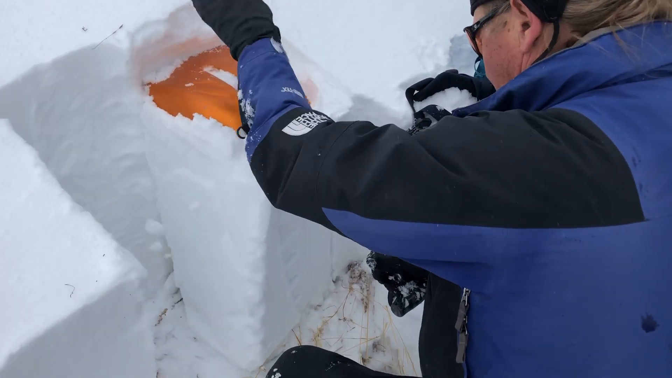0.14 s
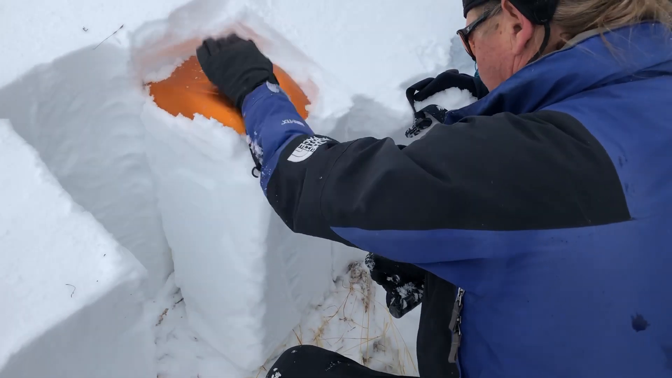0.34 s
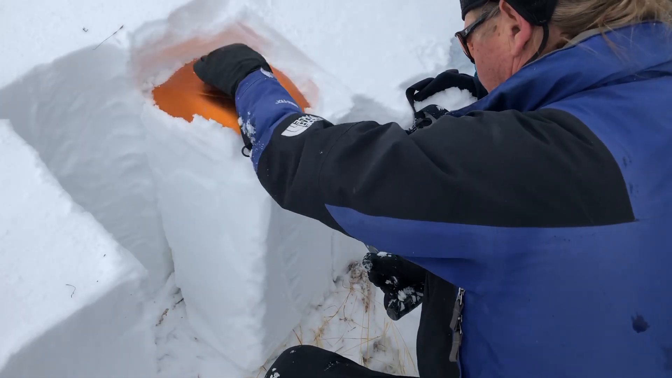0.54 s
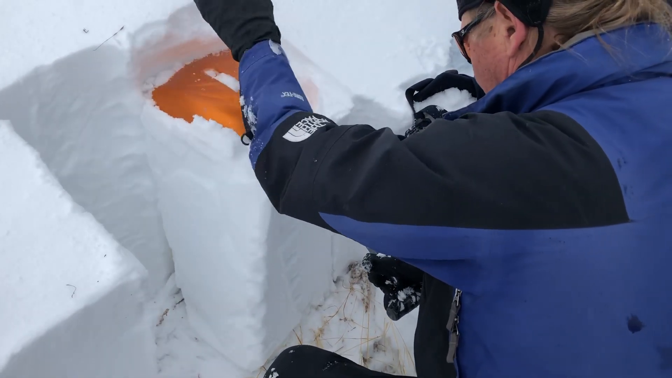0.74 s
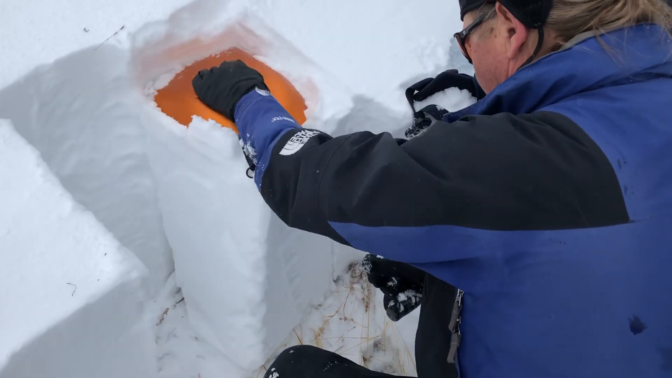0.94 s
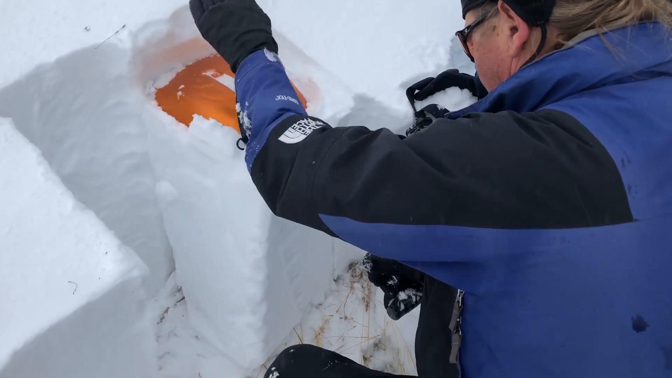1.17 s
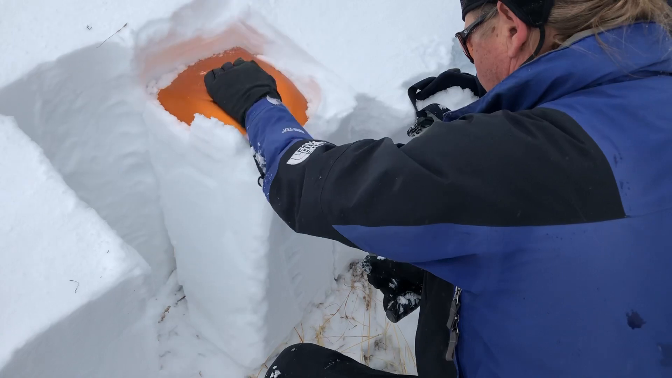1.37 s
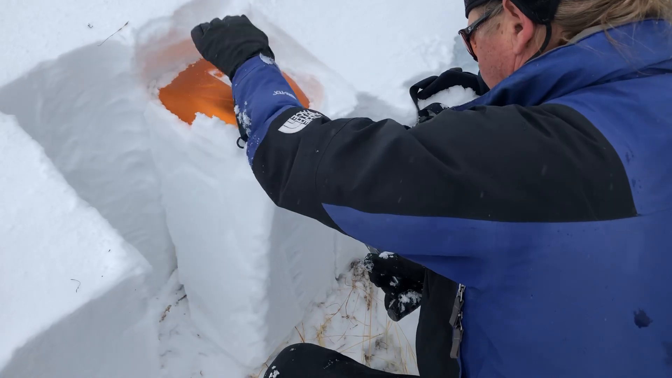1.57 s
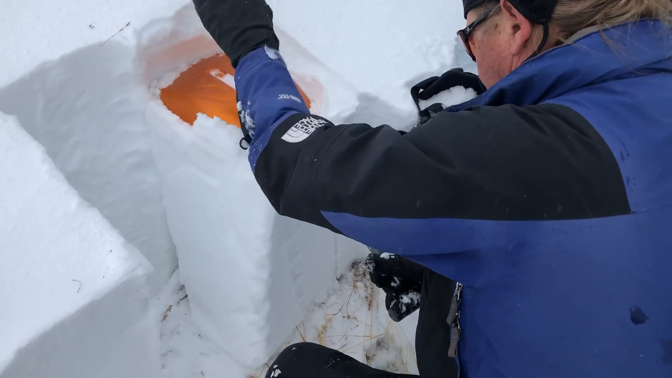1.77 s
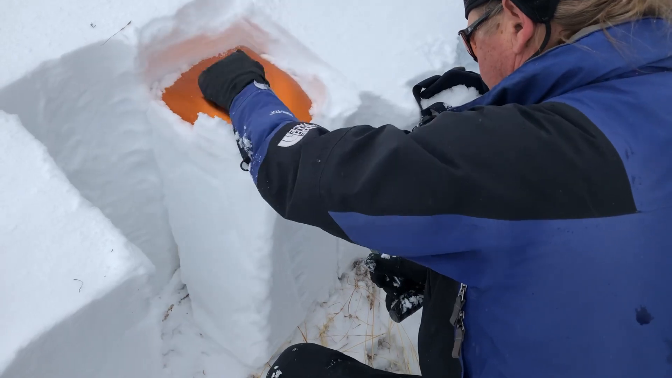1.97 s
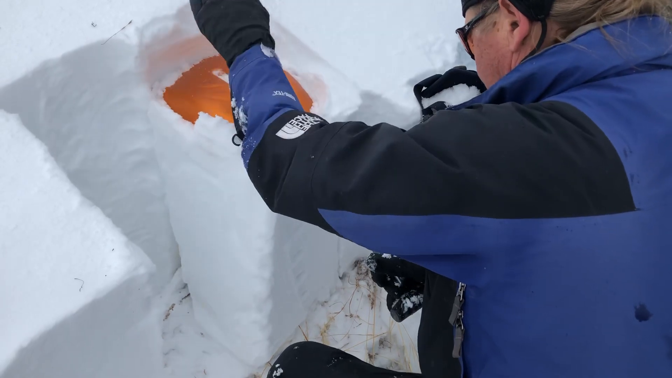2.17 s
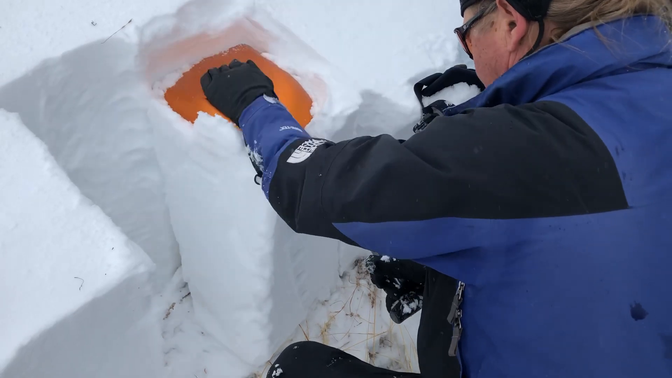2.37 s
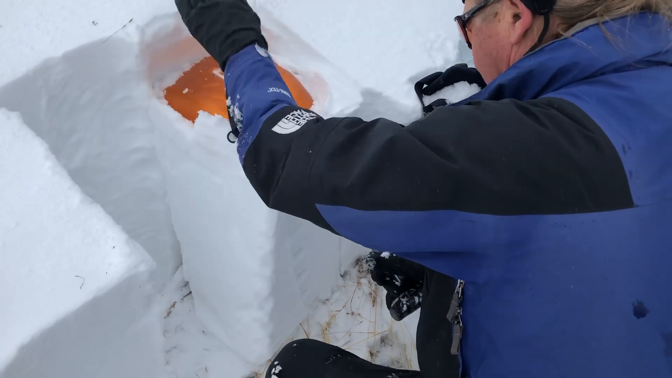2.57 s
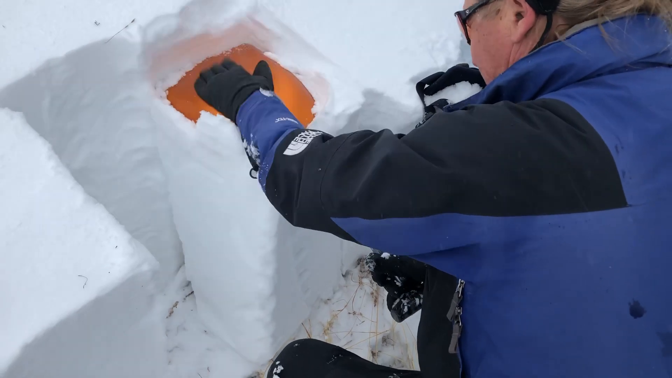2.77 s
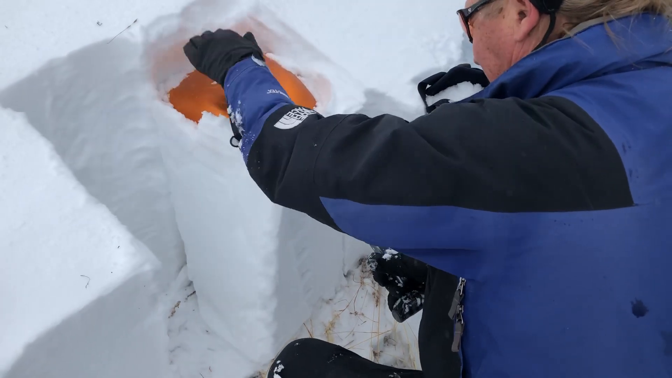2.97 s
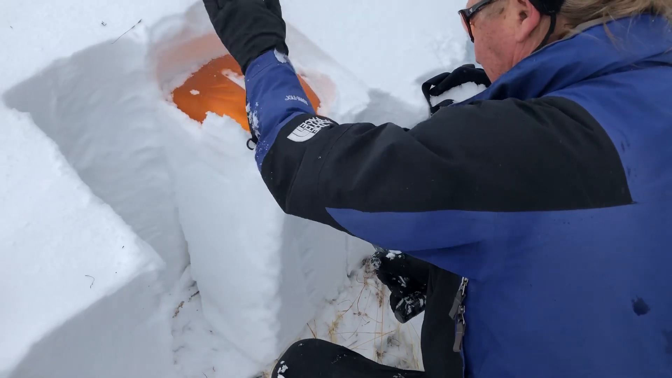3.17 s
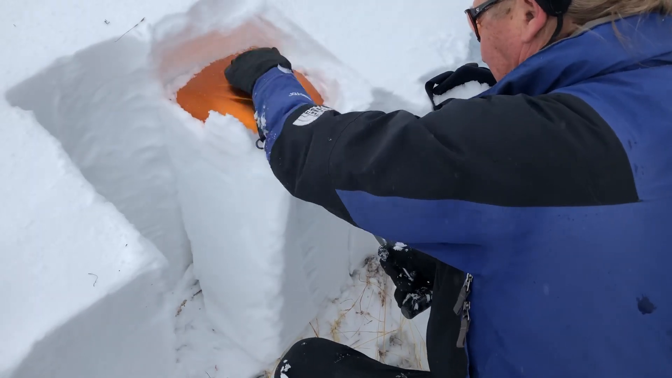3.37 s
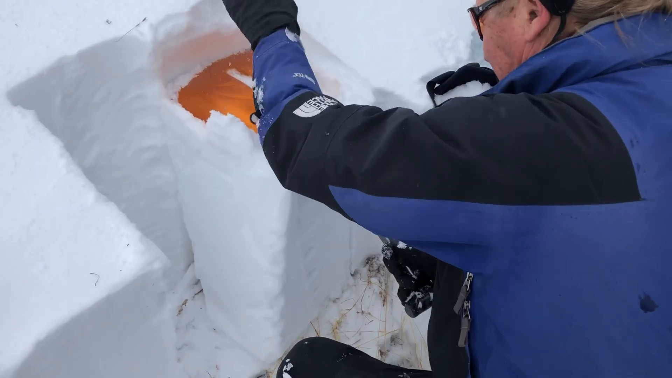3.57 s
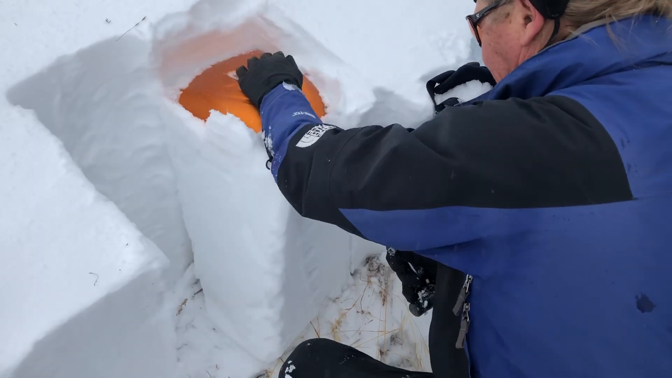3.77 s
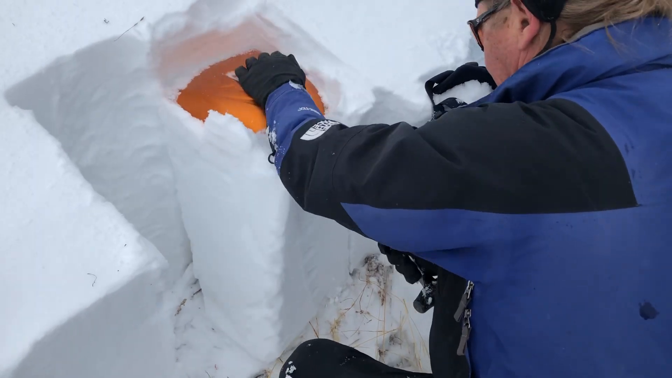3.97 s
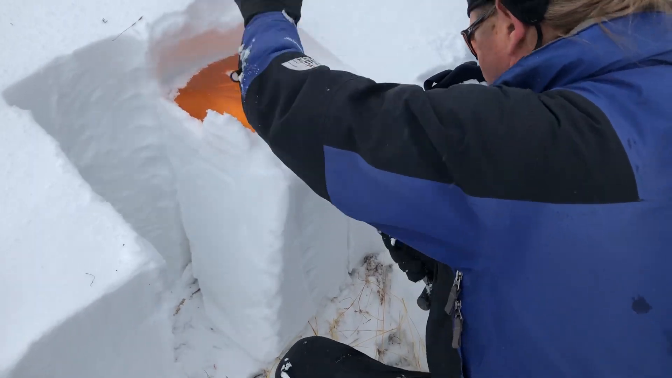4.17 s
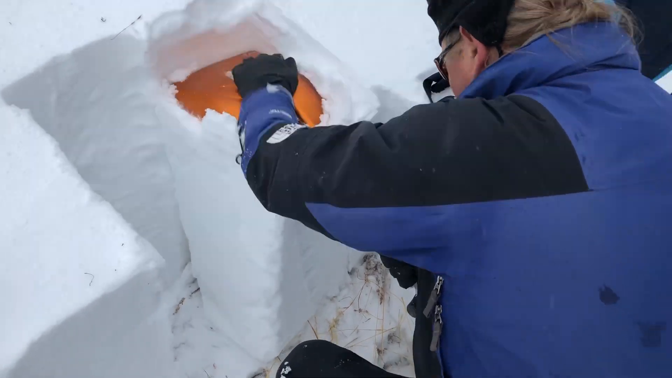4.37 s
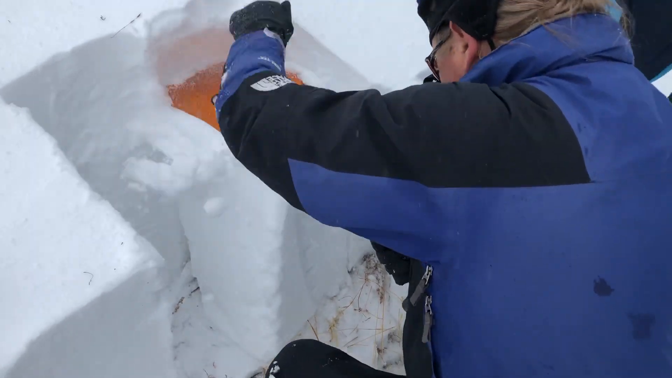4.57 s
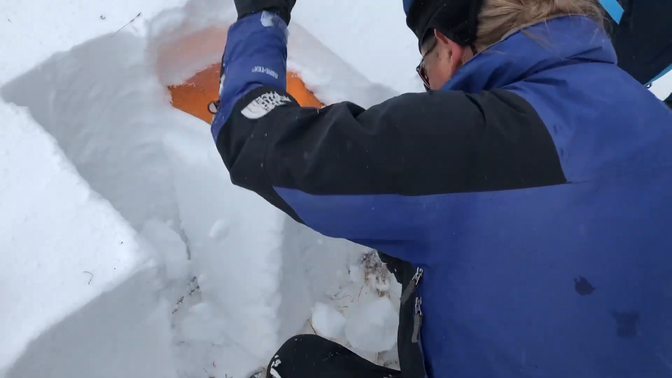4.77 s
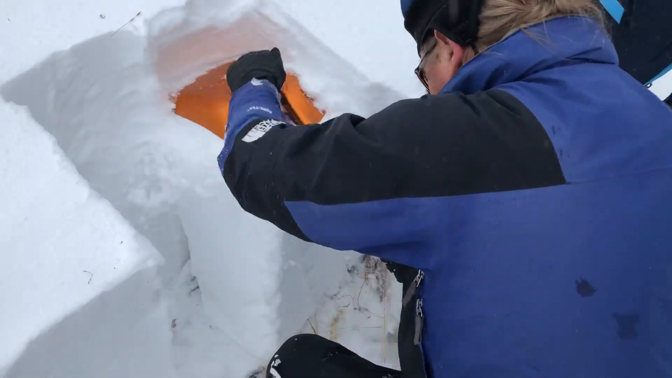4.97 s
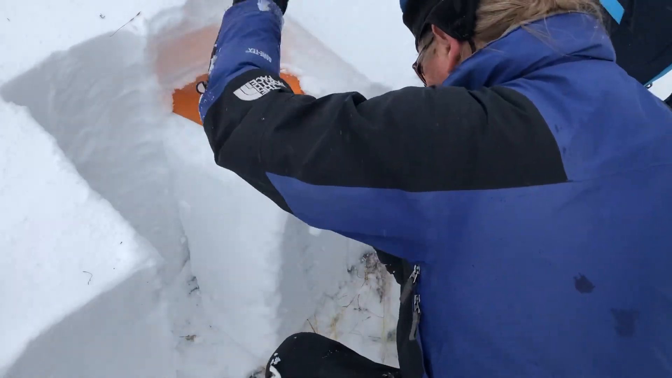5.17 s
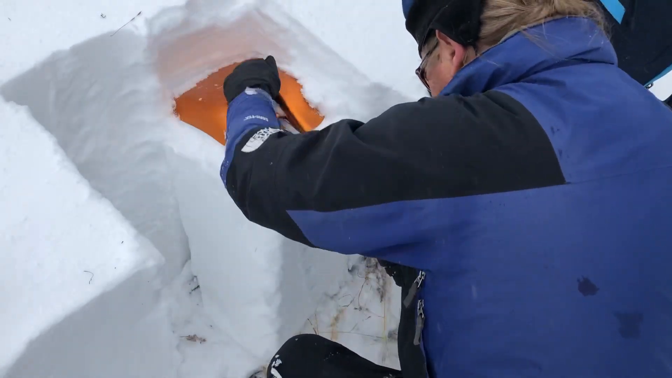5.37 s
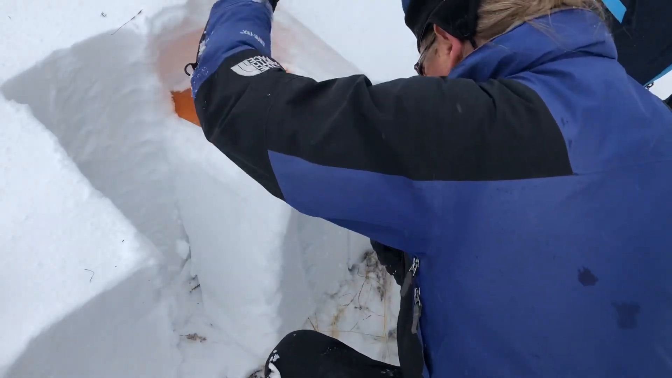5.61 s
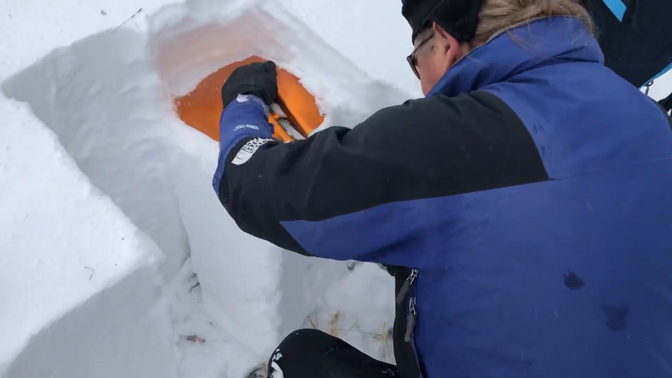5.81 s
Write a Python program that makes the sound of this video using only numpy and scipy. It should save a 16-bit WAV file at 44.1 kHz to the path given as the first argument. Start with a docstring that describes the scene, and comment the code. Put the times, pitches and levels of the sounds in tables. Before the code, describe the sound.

A gloved hand taps a metal shovel blade on snow twelve times, dull even knocks, the last four harder, with jacket rustle.

```python
"""A gloved hand taps a metal shovel blade lying flat on a snow column: twelve taps, the last four harder.
Snow damps the blade, so each tap is a brush of fabric, a short clack, a low thump and a little crunch.
The glove rebounds after the first five taps. The sleeve rustles, creases and snow crumbs tick,
and the arm pushes puffs of air. Quiet outdoor air lies underneath; the open slope gives no echo."""
import sys
import numpy as np
from scipy import signal
from scipy.fft import rfft, irfft, next_fast_len
from scipy.io import wavfile
from scipy.ndimage import uniform_filter1d

SR = 44100
rng = np.random.default_rng(int(sys.argv[2]) if len(sys.argv) > 2 else 0)


def bounce(signal):
    """Save signal as a 16-bit WAV file at the path given by the first command-line argument."""
    frames = np.transpose(np.atleast_2d(signal))
    limited = np.clip(frames, -1, 1)
    pcm = np.round(limited * 32767).astype(np.int16)
    wavfile.write(sys.argv[1], SR, pcm)


N = 257717

# Blows of the hand. Each row: time in seconds, thump in dB, hollow note in dB, finger lag in ms,
# landing spread in ms, knock in dB, knock centre in Hz, clack in dB, clack centre in Hz, fabric in dB.
TAPS = [(0.4087, -16, -39, 1.34, .59, -23, 622, -22, 1720, -26.5),
        (.9070, -18, -27, 0.41, 0.31, -25.5, 625, -29.5, 1660, -27.5),
        (1.4064, -22, -24.5, 0.99, 0.24, -24.5, 683, -28.5, 1840, -26.5),
        (1.8782, -21, -19.5, 0.3, 0.43, -20.5, 980, -54.5, 1520, -26.5),
        (2.3601, -22, -30.5, 1.44, 0.73, -29.5, 806, -30, 2050, -29.5),
        (2.8321, -23.5, -27.5, 1.38, 2.36, -24, 724, -32, 2010, -29),
        (3.2858, -15, -24.5, 2.28, 0.31, -20.5, 724, -21, 1790, -25.5),
        (3.7213, -20.5, -27, 3.12, 2.2, -26.5, 1000, -24, 2630, -24),
        (4.4280, -10, -19.5, 0.88, 0.97, -17.5, 563, -17, 2600, -21.5),
        (4.8832, -7, -24.5, 0.72, 1.07, -23, 993, -18.5, 1900, -20),
        (5.33, -10, -23, 1, 0.28, -21, 740, -18.5, 3400, -23),
        (5.7763, -9, -30.5, 1.15, 1.34, -25, 870, -19.5, 2450, -20.5)]
MID_THUMP_DB = -16  # a middling tap

SIZE, LEAD = 8192, 512  # samples: one short sound, its part before contact
AGE_S = (np.arange(SIZE) - LEAD) / SR
FREQ_HZ = np.maximum(np.arange(SIZE // 2 + 1) * SR / SIZE, 1)


def undb(db):
    """Decibels to gain."""
    return 10 ** (np.asarray(db) / 20)


def unit(x):
    """Scale to rms 1."""
    return x / np.sqrt(np.mean(x ** 2))


def band(hz, width_hz, f=FREQ_HZ):
    """Resonance response, gain 1 at its centre."""
    return 1j * f * width_hz / (hz ** 2 - f ** 2 + 1j * f * width_hz)


def high(hz):
    """Second-order high-pass response."""
    return -FREQ_HZ ** 2 / (hz ** 2 - FREQ_HZ ** 2 + 1j * FREQ_HZ * hz * np.sqrt(2))


def low(hz):
    """First-order low-pass response."""
    return 1 / (1 + 1j * FREQ_HZ / hz)


def burst(spectrum, db):
    """Short sound from its spectrum, with the energy of 10 ms at db."""
    x = irfft(spectrum)
    return x * undb(db) / np.sqrt(np.sum(x ** 2) * 100 / SR)


def noise(colour):
    """Steady noise, rms 1, shaped by (Hz, dB) points."""
    hz, db = np.transpose(colour)
    f = np.maximum(np.arange(N // 2 + 1) * SR / N, 1)
    gain = undb(np.interp(np.log(f), np.log(hz), db))
    return unit(irfft(rfft(rng.standard_normal(N)) * gain, N))


def grains(envelope, spread_db):
    """Spectrum of tiny uneven clicks under an envelope."""
    return rfft(envelope * rng.standard_normal(SIZE) * undb(spread_db * rng.standard_normal(SIZE)))


def swell(rise_s, fall_s):
    """Exponential rise to contact, then decay."""
    return np.exp(-np.abs(AGE_S) / np.where(AGE_S < 0, rise_s, fall_s))


def walk(rate_hz):
    """Smooth random wander, rms 1."""
    step = int(SR / rate_hz)
    stairs = np.repeat(rng.standard_normal(N // step + 1), step)
    return unit(uniform_filter1d(stairs, step)[:N])


def humps(rows):
    """Gaussian swells of level."""
    t = np.arange(N) / SR
    return sum(undb(db) * np.exp(-.5 * ((t - at_s) / width_s) ** 2) for at_s, db, width_s in rows)


def add(out, at_s, x):
    """Mix in a short sound with its contact at at_s."""
    start = int(at_s * SR) - LEAD
    out[start:start + SIZE] += x[:N - start]


def air():
    """Outdoor air with a wavering rumble; the arm pushes low puffs over the microphone."""
    # Air puffs. Each row: time in seconds, level in dB, width in seconds.
    puffs = [(1.35, -49, 0.023), (1.43, -45, 0.018), (1.775, -49, 0.017), (1.896, -39.5, 0.017),
             (1.958, -48.5, 0.016), (2.27, -46, 0.013), (3.755, -39, 0.011), (4.07, -49.5, 0.025),
             (4.195, -40, 0.019), (4.792, -45, 0.013)]
    rumble = noise([(25, -4.5), (55, 2), (160, -2.5), (260, -19), (450, -39.5), (2000, -72.5)])
    waver = undb(-74 + 5 * walk(14))
    ambience = noise([(25, 6.5), (60, -3), (110, -13), (270, -5.5), (450, -18), (800, -22),
                      (1500, -24), (2700, -30), (7000, -30.5), (16000, -33)])
    return ambience * undb(-59.5) + rumble * (humps(puffs) + waver)


def rubbing():
    """Fabric rubbing level: a swing into each tap, a hold, a lift, over the jacket's own movement."""
    # Jacket rustle once the arm swings from the shoulder. Each row: time in seconds, level in dB.
    jacket = [(3.86, -88), (3.92, -70), (4.2, -61), (4.34, -62), (4.55, -60), (4.68, -61), (4.74, -59.5),
              (4.82, -67), (4.96, -59.5), (5.015, -57.5), (5.06, -66), (5.3, -67), (5.45, -62),
              (5.66, -66.5), (5.84, -56.5)]
    idle_db, swing_db, hold_db = -81.5, -61, -66.5  # swing and hold of a middling tap
    rise_s, hold_s, lift_s = 0.042, 0.14, 0.039
    t = np.arange(N) / SR
    jacket_db = np.interp(t, *np.transpose(jacket), left=-np.inf)
    power = undb(idle_db) ** 2 + undb(jacket_db) ** 2
    for at_s, thump_db, *_ in TAPS:
        age_s = t - at_s
        swing = undb(swing_db) * np.exp(-np.abs(age_s) / rise_s)
        hold = undb(hold_db) * np.exp(-np.maximum(age_s - hold_s, 0) / lift_s)
        effort = undb(0.28 * (thump_db - MID_THUMP_DB))
        power += (np.where(age_s < 0, swing, hold) * effort) ** 2
    return np.sqrt(power)


def sleeve(rub_level):
    """Fabric slides over itself in grainy strokes; creases crinkle in the treble, the cuff hisses."""
    # Rustle spectrum. Each row: frequency in Hz, relative level in dB.
    rustle_colour = [(210, -36.5), (350, 2), (791, 3), (1700, -4.5), (1970, -6), (2200, -13), (2540, -5.5),
                     (3980, -10.5), (7190, -12), (16000, -21.5)]
    # Quick slides of the cuff. Each row: time in seconds, level in dB, width in seconds.
    swishes = [(.03, -57, 0.018), (2.872, -50, 0.016), (3.925, -62, 0.014), (3.99, -58, .1),
               (4.52, -60, 0.11)]
    roughness = undb(1.34 * walk(40) + 4.06 * walk(900))  # slow flicker, fine grain
    crinkle = undb(-9 + 5 * walk(23) + 2.5 * walk(1200))
    rustle = noise(rustle_colour)
    creases = noise([(1500, -18.5), (3500, -3.5), (5000, -3.5), (7200, -1),
                     (10000, -12.5), (16000, -13.5)])
    cuff = noise([(1500, -3), (3500, -4.5), (9000, -8), (16000, -14)]) * humps(swishes)
    return rub_level * (rustle * roughness + creases * crinkle) + cuff


def tick(db, hz):
    """Tight cluster of clicks: dull for soft crumbs, bright for creases."""
    cluster = grains(swell(0.0004, 0.0013), spread_db=4)
    return burst(cluster * band(hz, 1.8 * hz) ** 2 * low(2 * hz), db)


def ticks(rub_level):
    """Clothing and snow crumbs: a few clear ticks, and faint random ones that follow the rubbing."""
    # Clear ticks. Each row: time in seconds, level in dB, centre in Hz.
    clear_ticks = [(1.685, -63.5, 4060), (2.907, -53.5, 820), (3.564, -52.5, 1115), (3.61, -60.5, 5400),
                   (3.645, -59.5, 1550), (3.911, -56, 1340), (4.071, -52, 885), (4.142, -58, 2770),
                   (4.214, -52, 1750), (4.28, -59, 3640), (4.745, -78, 1430), (4.799, -49.5, 1390),
                   (5.171, -62.5, 2480), (5.197, -56.5, 1280), (5.272, -56, 1140), (5.53, -50.5, 4320),
                   (5.719, -55.5, 820)]
    out = np.zeros(N)
    for at_s, db, hz in clear_ticks:
        add(out, at_s, tick(db, hz))
    crumbs_per_s = 16
    count = int(crumbs_per_s * N / SR)
    contacts = rng.integers(2 * LEAD, N, count)
    for i, (size, pitch) in zip(contacts, rng.standard_normal((count, 2))):
        crumb = tick(db=-1 + 2.5 * size, hz=2600 * 2 ** (0.28 * pitch))
        add(out, i / SR, rub_level[i] * crumb)
    return out


def snow_crunch(fabric_db):
    """Snow packs under the blade, then settles; being soft, it makes little treble."""
    packing = grains(swell(0.0005, 0.009), spread_db=5.5) * band(1000, 7000)
    settling = grains(swell(0.0058, 0.04), spread_db=5.5) * band(2300, 8000)
    soft = low(11000)
    return burst(packing * soft, fabric_db - 11.5) + burst(settling * soft, fabric_db - 24.5)


def glove_shell(touching, fabric_db):
    """The loose shell brushes the metal, then the hand squeezes it flat."""
    colour = (band(2800, 6000) + 1.1 * band(6900, 1100)) * high(900) * low(11000)
    brush = grains(touching * swell(0.0046, 0.0027), spread_db=0)
    squeeze = grains(swell(0.0003, 0.00043), spread_db=12)
    return burst(brush * colour, fabric_db - 3) + burst(squeeze * colour, fabric_db - 10.5)


def snow_thump(push, thump_db):
    """The blade bounces on packed snow, a damped spring; harder blows shake the whole column more."""
    column_db = -5 + 0.29 * (thump_db - MID_THUMP_DB)
    spring = band(152, 95) + undb(column_db) * band(67, 140)
    return burst(-push * spring * low(500), thump_db)


def blade():
    """Responses of the low bending modes and the high plate modes, slightly detuned by the hand."""
    # Blade modes on snow. Each row: frequency in Hz, relative level in dB, T60 in seconds.
    modes = [(543, 6.5, 0.012), (775, -1, 0.02), (1078, 5, 0.0083), (1326, -5, 0.041), (1820, 2.5, 0.0068),
             (2667, -1.5, 0.012), (3126, -2.5, .01), (3485, -1.5, 0.0035), (4380, -2, 0.0081),
             (5010, 2.5, 0.0045), (6120, 1, 0.018), (7450, 0, 0.005)]
    split_hz = 1450
    detunes = 1 + 0.02 * rng.standard_normal(len(modes))
    bending = plate = 0
    for (hz, db, t60_s), detune in zip(modes, detunes):
        mode = undb(db) * band(hz * detune, width_hz=np.log(1000) / np.pi / t60_s)
        if hz < split_hz:
            bending += mode
        else:
            plate += mode
    return bending, plate


def rebound(db):
    """The glove falls back on the blade: a light touch with little treble."""
    touch = grains(swell(0.00075, 0.0014), spread_db=7)
    body = sum(blade()) * low(3800) ** 2 + 2.9 * band(200, 170)
    return burst(touch * body, db)


def tap(thump_db, hollow_db, lag_ms, spread_ms, knock_db, knock_hz, clack_db, clack_hz, fabric_db):
    """Palm, then fingers land: the blade sinks into the snow and rings briefly."""
    bending, plate = blade()
    palm = np.exp(-2j * np.pi * FREQ_HZ * LEAD / SR)  # impulse at contact
    fingers = 0.66 * palm * np.exp(-2j * np.pi * FREQ_HZ * lag_ms / 1000)
    push = palm + fingers
    thump = snow_thump(push, thump_db)
    hollow = burst(-push * band(260, 150) ** 2 * low(600), hollow_db)  # the dished blade flexes
    shell_lead_s = 0.0043  # the shell touches before the hand
    touching = np.clip((AGE_S + shell_lead_s) * 1000, 0, 1)
    # Glove folds land one by one and roughen the push.
    landing = swell(spread_ms / 1000, 0.0011) + 0.13 * swell(0.02, 0.001)
    folds = grains(touching * landing, spread_db=3.5)
    folds /= np.sqrt(np.mean(np.abs(folds) ** 2))
    # The spot struck decides which modes speak most.
    knock_colour = bending * band(knock_hz, 0.54 * knock_hz) * high(330)
    knock = burst((push + 1.1 * folds) * knock_colour, knock_db)
    clack = burst(folds * plate * band(clack_hz, 0.32 * clack_hz), clack_db)
    return thump + hollow + knock + clack + glove_shell(touching, fabric_db) + snow_crunch(fabric_db)


def taps():
    """All blows on the blade, and the glove's bounces."""
    # Glove bounces. Each row: time in seconds, level in dB.
    bounces = [(0.4861, -47.5), (0.9922, -47.5), (1.481, -46), (1.95, -49.5), (2.4443, -47.5)]
    out = np.zeros(N)
    for at_s, *blow in TAPS:
        add(out, at_s, tap(*blow))
    for at_s, db in bounces:
        add(out, at_s, rebound(db))
    return out


def scene():
    """Mono mix, all at arm's length."""
    rub_level = rubbing()
    return (taps() + sleeve(rub_level) + air() + ticks(rub_level))[None]


def record(dry):
    """A chain of crossovers delays lows behind highs; deep bass and top are cut."""
    size = next_fast_len(2 * N)
    f = np.arange(size // 2 + 1) * SR / size
    crossovers_hz = 150 * 2.15 ** np.arange(7)
    allpass = np.prod([1 - 2 * band(hz, np.sqrt(2) * hz, f) for hz in crossovers_hz], axis=0)
    smeared = irfft(rfft(dry, size) * allpass, size)[:, :N]
    bass_hz, top_hz = 51, 15900
    bass_cut = signal.butter(5, bass_hz, "highpass", fs=SR, output="sos")
    top_cut = signal.ellip(8, 0.2, 70, top_hz, fs=SR, output="sos")
    return signal.sosfilt(np.vstack([bass_cut, top_cut]), smeared)


dry = scene()
out = record(dry)
bounce(out)
```